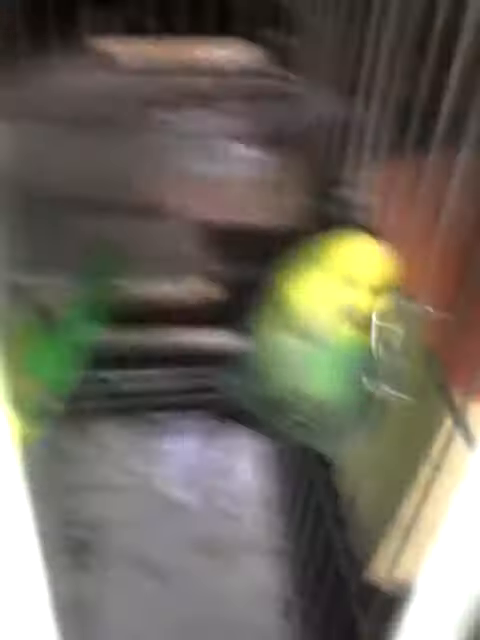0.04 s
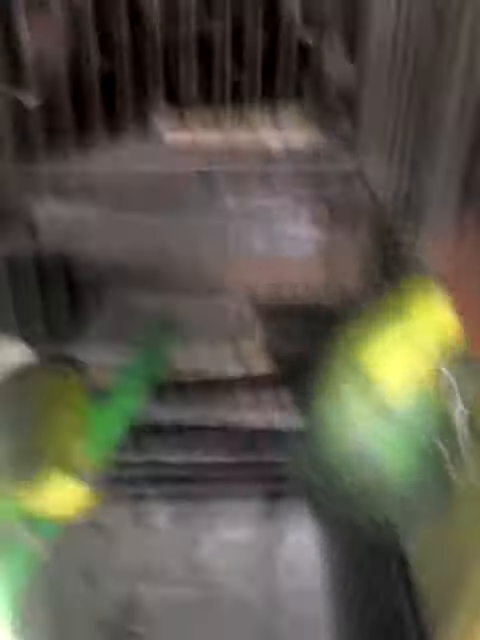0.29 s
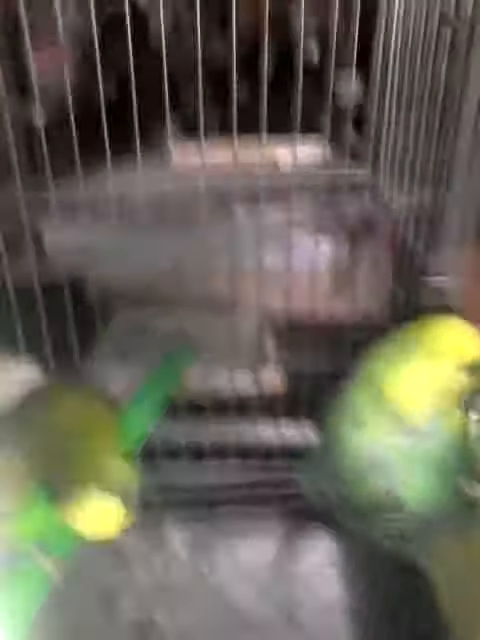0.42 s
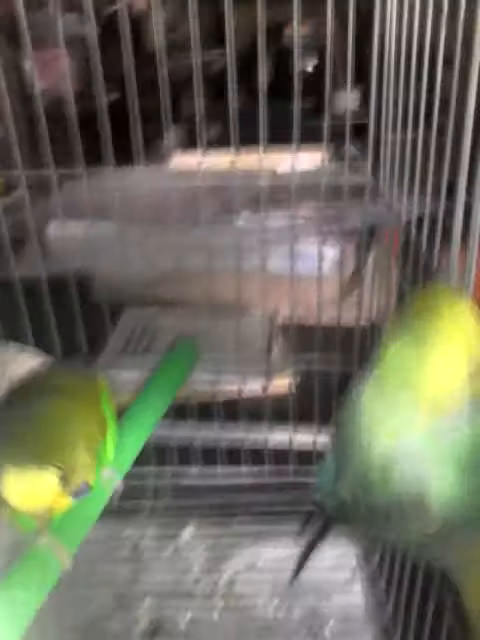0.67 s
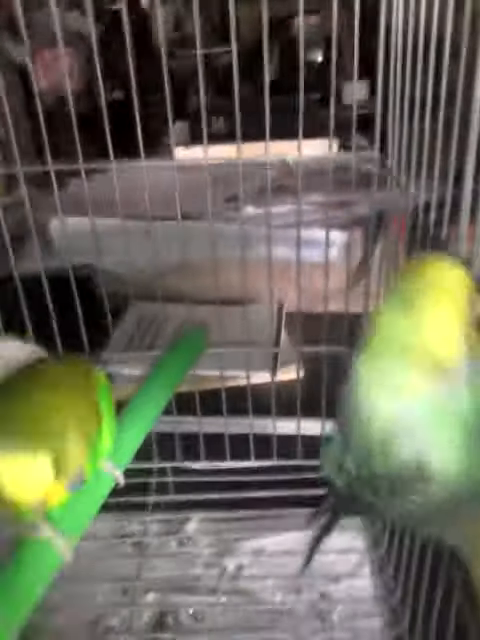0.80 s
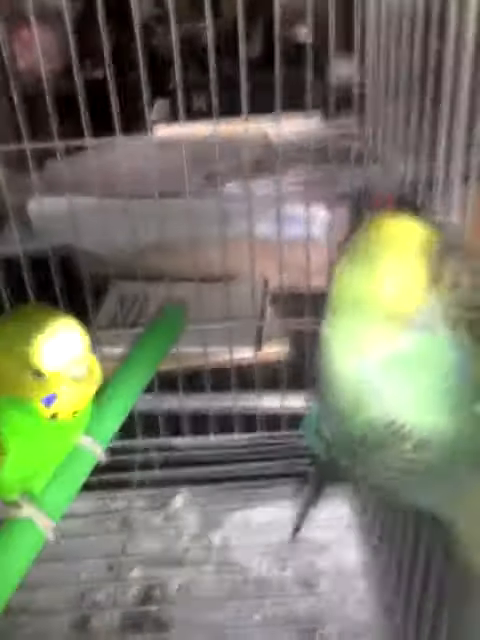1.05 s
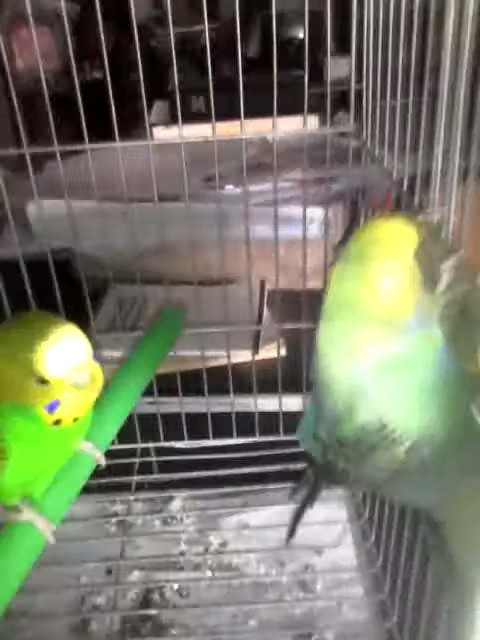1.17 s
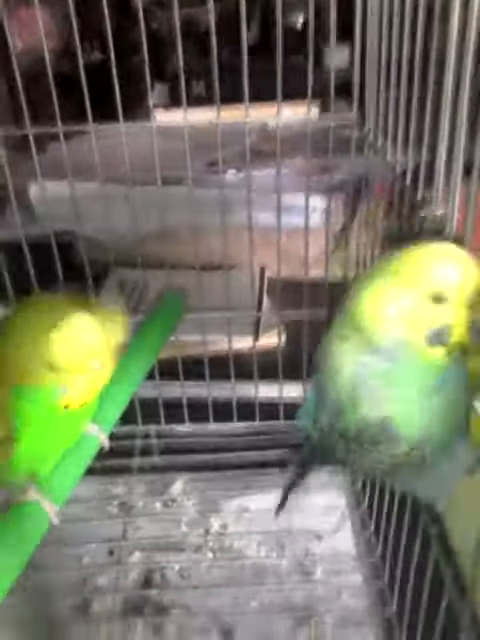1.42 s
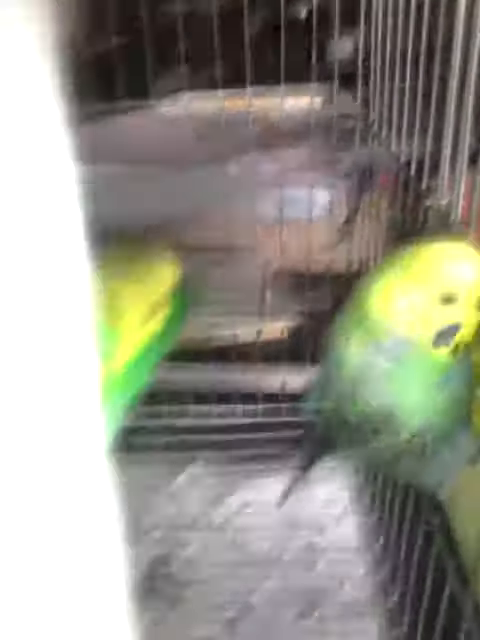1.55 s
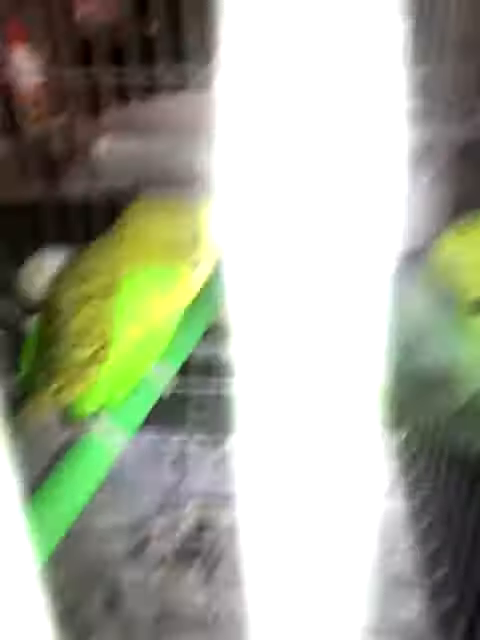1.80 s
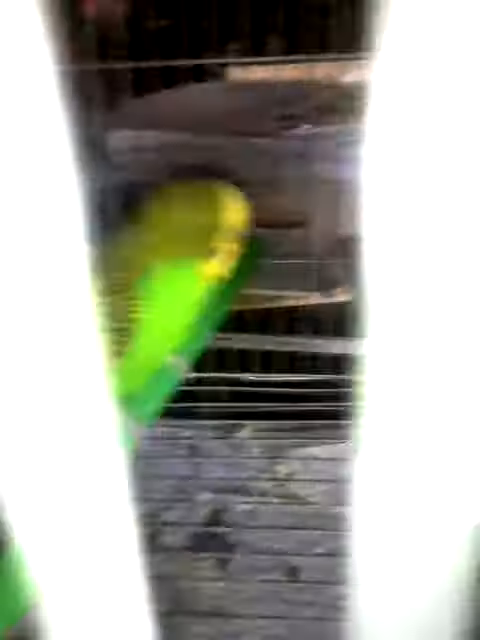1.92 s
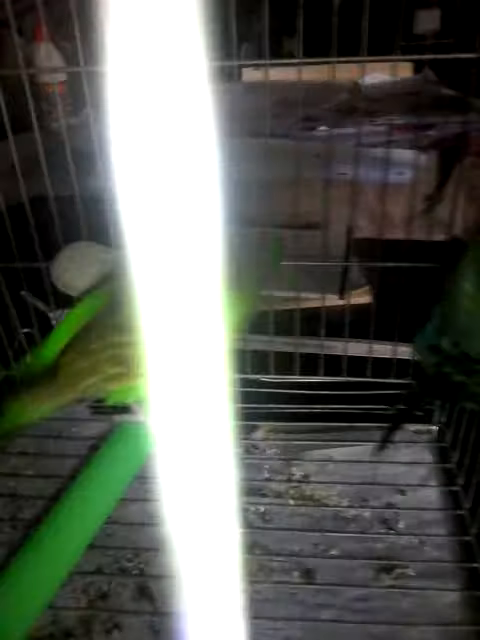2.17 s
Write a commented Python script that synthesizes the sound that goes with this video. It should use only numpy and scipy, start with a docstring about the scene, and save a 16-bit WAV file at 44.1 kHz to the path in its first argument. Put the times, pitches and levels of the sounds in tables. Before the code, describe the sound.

A budgerigar gives one quick chirping warble amid dull knocks and rubbing of a handled phone

```python
"""In a quiet room a budgerigar in a wire cage gives one fast warbling call; a fainter one trails after it.
The call is a run of short gliding whistles with weak overtones and a faint reverberant tail.
A hand shifts on the phone: slips and knocks excite damped resonances of the case, which rubs and rings dully.
A broad hiss of coloured noise swells and fades; faint resonant rustling comes before and after,
and at last only that and the steady room air are left."""
import sys
import numpy as np
from scipy import signal
from scipy.io import wavfile
from scipy.ndimage import uniform_filter1d

SR = 44100
rng = np.random.default_rng(int(sys.argv[2]) if len(sys.argv) > 2 else 0)


def boost(x):
    """Linear amplitude factor 10**(x/20) for a level x in decibels (scalar or array-like)."""
    u = np.asarray(x, float) / 20
    return 10 ** u


def inscribe(sig):
    """Save sig as 16-bit PCM at rate SR to the path in sys.argv[1].

    A 1-D sig is mono; a 2-D sig holds one channel per row.
    Samples are clipped to [-1, 1] before scaling.
    """
    pcm = np.round(np.clip(np.atleast_2d(sig).T, -1, 1) * 32767)
    wavfile.write(sys.argv[1], SR, pcm.astype(np.int16))


N = 99225  # samples, 2.25 s


def unit_rms(x):
    """Normalisation: scales a signal to a root mean square of 1."""
    return x / np.sqrt(np.mean(x ** 2) + 1e-20)


def read(points, hz):
    """Spectral interpolation: reads a table of points on a logarithmic frequency axis."""
    f, value = np.transpose(points)
    return np.interp(np.log(hz + 1), np.log(f + 1), value)


def envelope(s, db, smoothing):
    """Amplitude modulation: a gain from levels linear in dB, -120 dB outside, averaged over some samples."""
    level_db = np.interp(np.arange(N) / SR, s, db, left=-120, right=-120)
    return uniform_filter1d(boost(level_db), size=smoothing)


def add(mix, s, sound):
    """Superposition: adds a sound into the mix from time s on."""
    part = mix[round(s * SR):][:len(sound)]
    part += sound[:len(part)]


def resonate(x, hz, pole_width):
    """Heterodyne resonance of movable centre: shift down to zero, smooth three times, shift back."""
    turn = np.exp(2j * np.pi * np.cumsum(hz * np.ones(len(x))) / SR)
    r = np.exp(-np.pi * pole_width / SR)
    low = x / turn
    for _ in range(3):
        low = signal.lfilter([1 - r], [1, -r], low)
    return 2 * (turn * low).real / np.sqrt(pole_width)


def rings(x, modes):
    """Modal superposition: sums the responses of several resonances to one excitation."""
    # three equal poles in a row are about half as wide as one, hence the doubling
    return sum(boost(db) * resonate(x, hz, 2 * width) for hz, width, db in modes)


def noise(colour, patchy_db, extra_db=0):
    """Short-time spectral synthesis: random spectra with drifting patches; extra_db is f(Hz, s) or 0."""
    frames, hz = N // 128 + 5, np.fft.rfftfreq(512, 1 / SR)[:, None]
    real, imaginary, patches = rng.standard_normal((frames, 257, 3)).T
    patches = uniform_filter1d(patches, size=6, axis=0)
    patches = unit_rms(uniform_filter1d(patches, size=12, axis=1))
    z = (real + 1j * imaginary) * boost(read(colour, hz) + patchy_db * patches)
    # the rms is taken before extra_db, so that its levels survive
    scale = np.sqrt(np.mean(signal.istft(z, nperseg=512, noverlap=384)[1] ** 2))
    if extra_db:
        z = z * boost(extra_db(hz, np.arange(frames) * 128 / SR))
    return signal.istft(z, nperseg=512, noverlap=384)[1][:N] / scale


# spectrum of the steady background: f/Hz, relative density level/dB
AIR_COLOUR = [(20, -22.5), (90, -1.5), (235, -12.5), (400, -1), (605, -8), (1100, -18), (1850, -15),
              (2300, -18.5), (6300, -22), (7300, -29.5), (9000, -33.5), (15400, -34)]
AIR_DB = -71  # overall rms level


def room_air():
    """Stationary coloured noise: faint room air and circuit noise."""
    return boost(AIR_DB) * noise(AIR_COLOUR, patchy_db=0.0)


# dull rustle, one list before and one after: t/s, dull level/dB, dull ring f/Hz, bass level/dB
RUSTLE = [
    [(0.0, -63.5, 515, -63), (0.074, -63.5, 640, -76), (0.1, -76, 565, -74), (0.12, -58, 540, -74)],
    [(1.6, -58, 607.7, -67.5), (1.66, -70, 570, -63.5), (1.8, -91, 585, -69), (1.92, -73.5, 615, -81.5),
     (2.25, -65.5, 569, -69.5)],
]
# fixed resonance above the dull ring: f/Hz, width/Hz, relative level/dB
RUSTLE_UPPER = [(930, 360, -9)]
# low resonances: f/Hz, width/Hz, relative level/dB
RUSTLE_BASS = [(139, 88, 0), (240, 44, -6)]
RUSTLE_WIDTH_HZ = 85


def rustle():
    """Resonant filtering of noise: a dull, drifting ring and low fixed ones."""
    t, out = np.arange(N) / SR, np.zeros(N)
    for rows in RUSTLE:
        s, dull_db, ring_hz, bass_db = np.transpose(rows)
        source = rng.standard_normal(N)
        dull = resonate(source, np.interp(t, s, ring_hz), 2 * RUSTLE_WIDTH_HZ)
        dull = dull + rings(source, RUSTLE_UPPER)
        bass = rings(rng.standard_normal(N), RUSTLE_BASS)
        for x, level_db in ((dull, dull_db), (bass, bass_db)):
            out += unit_rms(x) * envelope(s, level_db, 200)
    return out


# course of the hiss: t/s, level/dB before a common lift of 4.5 dB, extra level below 3.3 kHz/dB
HISS = [(0.0, -58.5, 0), (0.094, -58, -1.5), (0.174, -62, 1), (0.248, -57, 1), (0.51, -59.5, 0.5),
        (0.569, -55, 2.5), (0.838, -56, -1), (0.942, -61, -1), (0.946, -60, 5), (1.068, -58, 0),
        (1.248, -72.5, -4.5), (1.326, -60, -1), (1.62, -93.5, 0)]
# its spectrum: f/Hz, relative density level/dB
HISS_COLOUR = [(900, -53), (1370, -24.5), (1700, -18), (2030, -12), (2480, -10), (3330, -4), (3800, -6),
               (5440, -6.5), (6500, -3), (7000, -12), (7650, -25), (8600, -38.5), (10200, -36.5),
               (11500, -45), (14000, -46.5), (15500, -65.5)]
PATCHY_DB = 2  # rms depth of the patches
# above TOP_HZ the hiss gains TOP_GROWTH dB more per dB of level over HISS_LOUD_DB, and loses it below
TOP_HZ, TOP_GROWTH, HISS_LOUD_DB = 6260, 0.88, -58


def hiss():
    """Time-varying coloured noise: level and spectral tilt drift, and the treble opens with strength."""
    s, db, tilt_db = np.transpose(HISS)

    def course(hz, t):
        """Level modulation: gain in dB by frequency and time."""
        level = np.interp(t, s, db, right=-120) + 4.5
        tilt = np.interp(t, s, tilt_db) * np.clip((4800 - hz) / 1500, 0, 1)
        over_db = np.interp(t, s, db) - HISS_LOUD_DB
        top = TOP_GROWTH * over_db * np.clip((hz - TOP_HZ) / 800, 0, 1)
        return level + tilt + top

    return noise(HISS_COLOUR, PATCHY_DB, course)


SLIPS_PER_S, SLIP_SPREAD_DB, CLUMP_DB = 4000, 1.5, 2  # mean rate, exponential spread, rms of clumping


def slips():
    """Stick-slip friction as a random impulse train: clumped slips of skin on plastic."""
    clumps = unit_rms(uniform_filter1d(rng.standard_normal(N), size=300))
    size = boost(SLIP_SPREAD_DB * np.minimum(rng.exponential(1, N), 4) + CLUMP_DB * clumps)
    happens = rng.random(N) < SLIPS_PER_S / SR
    return size * happens * rng.choice([-1., 1.], N)


# rubbing hand: t/s, main level/dB, main ring f/Hz, lower level/dB, bass level/dB, upper level re main/dB
HAND = [(0.119, -50.5, 734, -44, -70, -30), (0.183, -56, 737, -47.5, -54.5, -12),
        (0.225, -42.5, 752, -48.5, -64, -14), (0.27, -44, 752, -45.5, -59, -19),
        (0.296, -59.5, 750, -58, -64, -23), (0.372, -60, 745, -55.5, -68, -35),
        (0.409, -41, 773, -55, -72, -14), (0.445, -39.5, 771, -43.5, -54, -16),
        (0.474, -43.5, 771, -51, -62, -23), (0.5, -57, 770, -49.5, -59, -19),
        (0.572, -58.5, 769, -54, -60, -26), (0.596, -44, 769, -57, -61, -27),
        (0.613, -45, 760, -45.5, -56.5, -16), (0.639, -33.5, 740, -35, -52.5, -18),
        (0.675, -39, 742, -40, -49.5, -12.5), (0.729, -30, 709, -36, -53.5, -20),
        (0.761, -34.5, 708, -46.5, -49.5, -19), (0.843, -35.5, 752, -49, -60.5, -15),
        (0.941, -37.5, 792, -52, -50, -11), (0.981, -44.5, 766, -55, -57, -11),
        (1.067, -40.5, 759, -55, -66, -24), (1.121, -53, 766, -67.5, -52.5, -6.5),
        (1.141, -49, 793, -60, -71, -5), (1.219, -41.5, 724, -53.5, -62, -21),
        (1.325, -55, 727, -67, -62.5, -31), (1.359, -39, 742, -70, -65, -8),
        (1.379, -38.5, 732, -53, -54.5, -13), (1.437, -49.5, 764, -59.5, -69, -15.5),
        (1.457, -43, 765, -54.5, -54.5, -18.5), (1.531, -50.5, 754, -58.5, -66, -20),
        (1.559, -50.5, 768, -57.5, -87, -5), (1.585, -37.5, 773, -54, -81, -23.5)]
# resonances of the case, fixed ones beside the moving main ring: f/Hz, width/Hz, relative level/dB
MAIN = [(709.3, 42, -3.5), (834.2, 189, 4)]
LOWER = [(506, 61.7, 2), (459.2, 41, -6)]
BASS = [(125.5, 54, -0.5), (249.3, 29, -1.5), (84.04, 82, -2.5)]
UPPER = [(1795, 83, -7.5), (2036, 190, 1), (2500, 250, -3.5)]
MAIN_WIDTH_HZ = 70.7  # of the moving ring


def rubbing():
    """Friction-excited modal vibration: slips ring the case, and the grip shifts the main ring."""
    t = np.arange(N) / SR
    s, main_db, ring_hz, lower_db, bass_db, upper_db = np.transpose(HAND)
    friction = slips()
    main = rings(friction, MAIN) + resonate(friction, np.interp(t, s, ring_hz), 2 * MAIN_WIDTH_HZ)
    layers = [(main, main_db), (rings(slips(), LOWER), lower_db),
              (rings(slips(), BASS), bass_db), (rings(friction, UPPER), main_db + upper_db)]
    return sum(unit_rms(x) * envelope(s, db, 90) for x, db in layers)


# knocks: t/s, main ring peak level/dB, lower ring peak level/dB, bass thump peak level/dB
KNOCKS = [(0.118, -51, -70, -59), (0.218, -40.5, -39, -45.5), (0.469, -42.5, -73, -72),
          (0.632, -32, -37, -53), (0.692, -31, -43.5, -39.5), (0.722, -27, -33, -40.5),
          (0.759, -26, -34, -58), (1.347, -55, -52, -38), (1.3595, -28.5, -59, -60),
          (1.456, -40.5, -51.5, -54), (1.443, -36, -63, -65.5), (1.536, -40, -62, -61),
          (1.5565, -30, -69.5, -75), (1.573, -40, -59, -70), (1.616, -55.5, -61, -68)]
KNOCK_S = 0.00048  # time for the soft push to reach its peak
KNOCK_UPPER_DB, KNOCK_UPPER_HZ = -19, 2029  # upper ring: level re main, frequency


def knocks():
    """Impact excitation: an impulse rings the upper modes, a rounded push the lower ones."""
    out = np.zeros(N)
    s, _, ring_hz, *_ = np.transpose(HAND)
    u = np.arange(4096) / SR / KNOCK_S
    soft = [rings(u * np.exp(-u), modes) for modes in (LOWER, BASS)]
    for start, db, lower_db, thump_db in KNOCKS:
        frequencies = (np.interp(start, s, ring_hz), KNOCK_UPPER_HZ)
        sharp = [resonate(u == 0, hz, 2 * MAIN_WIDTH_HZ) for hz in frequencies]
        levels = (db, db + KNOCK_UPPER_DB, lower_db, thump_db)
        for blow, level_db in zip(sharp + soft, levels):
            add(out, start, boost(level_db) * blow / abs(blow).max())
    return out


# reverberation of the room: f/Hz, decay time by 60 dB t60/s
ROOM = [(1500, 0.2), (2500, .33), (4000, 0.33), (6000, 0.15), (11000, 0.1)]
ROOM_DB = -9  # energy of the tail against the direct sound


def room(x):
    """Statistical reverberation: sparse taps of random sign, each band decaying at its own rate."""
    taps = np.zeros(SR)
    at = np.arange(300, SR - 20, 20)
    taps[at + rng.integers(0, 20, len(at))] = rng.choice([-1., 1.], len(at))
    hz, t, z = signal.stft(taps, SR, nperseg=256)
    decay = boost(-60 * t / read(ROOM, hz)[:, None])
    tail = signal.istft(z * decay, SR, nperseg=256)[1]
    return boost(ROOM_DB) * signal.fftconvolve(x, tail / np.linalg.norm(tail))[:N]


# whistled notes: start t/s, length t/s, first f/Hz, last f/Hz, level/dB
NOTES = [(.845, 0.012, 3600, 2800, -42.5), (.858, 0.014, 1940, 2285, -38), (.860, .005, 2780, 3240, -31.5),
         (0.852, .007, 5000, 4140, -46.5), (.860, 0.0045, 5700, 4330, -43),
         (0.863, 0.018, 3536, 3755, -30.5), (0.876, .011, 3756, 3610, -26.5),
         (0.885, 0.014, 2470, 1495, -32.5), (0.887, 0.019, 3887, 2640, -29),
         (0.895, 0.022, 1430, 1470, -39), (.907, .011, 3600, 3606, -32.5),
         (.913, 0.0073, 2586, 2900, -30.5), (0.916, 0.03, 4250, 3775, -31),
         (0.938, 0.013, 3488, 3105, -20.5), (0.946, 0.015, 3045, 2910, -29), (0.948, .008, 2798, 1944, -24),
         (.949, .028, 2008, 2157, -25), (.975, .004, 1700, 2085, -30.5), (0.979, 0.0092, 2266, 2775, -25),
         (0.986, 0.0093, 3000, 3170, -23.5), (.993, 0.0053, 2820, 2990, -23),
         (0.998, .0055, 2977, 3435, -24.5), (1.078, 0.013, 3110, 3860, -41.5),
         (1.091, 0.012, 3273, 2780, -38.5), (1.111, 0.016, 2370, 2430, -39.5),
         (1.12, 0.017, 3183, 2844, -36), (1.144, 0.017, 3810, 2720, -39), (1.158, 0.011, 2610, 2830, -39.5),
         (1.176, 0.013, 2847, 2350, -34), (1.192, 0.019, 2210, 2210, -37.5),
         (1.206, 0.013, 2263, 2046, -35), (1.212, 0.026, 2181, 2073, -41),
         (1.243, 0.006, 2130, 2100, -36.5)]
# second harmonic, by the frequency where it falls: f/Hz, level re fundamental of a LOUD_DB note/dB
OCTAVE = [(3000, -49), (4200, -24), (5200, -12.5), (6200, -43), (7400, -21.5), (8300, -33)]
# third harmonic, likewise: f/Hz, level/dB
HIGHER = [(6000, -44), (8300, -51.5), (9600, -43.5), (10300, -53.5), (11100, -36.5), (12500, -67.5)]
OVERTONE_GROWTH, LOUD_DB = 0.7, -25  # overtones gain this many dB more per dB of note level
EDGE, LEAN = .4, 1.1  # share of a note in each of swell and fade; above 1 it peaks a little late
WOBBLE, RASP, OVERTONE_RASP = .017, .14, .7  # rms share: pitch unsteadiness, flutter of strength


def birds():
    """Frequency modulation: each note is a gliding, slightly unsteady whistle with weak harmonics."""
    out = np.zeros(N)
    shake = unit_rms(resonate(rng.standard_normal(N), 0, 1100))
    rasp = unit_rms(resonate(rng.standard_normal(N), 0, 900))
    for start, length, first_hz, last_hz, db in NOTES:
        u = np.arange(0, length, 1 / SR) / length
        span = slice(round(start * SR), round(start * SR) + len(u))
        hz = (first_hz + (last_hz - first_hz) * u) * (1 + WOBBLE * shake[span])
        phase = 2 * np.pi * np.cumsum(hz) / SR
        overtones = 0
        for k, table in ((2, OCTAVE), (3, HIGHER)):
            overtone_db = read(table, k * hz) + OVERTONE_GROWTH * (db - LOUD_DB)
            overtones = overtones + boost(overtone_db) * np.sin(k * phase)
        tone = (1 + RASP * rasp[span]) * np.sin(phase) + (1 + OVERTONE_RASP * rasp[span]) * overtones
        late = u ** LEAN
        swell = np.sin(np.pi / 2 * np.clip(np.minimum(late, 1 - late) / EDGE, 0, 1)) ** 2
        add(out, start, boost(db) * swell * tone)
    return out


def scene():
    """Linear superposition: rustle, hiss, hand, and the bird heard directly and through the room."""
    bird = birds()
    return (rustle() + hiss() + rubbing() + knocks() + bird + room(bird))[None]


def band_limit(x):
    """A steep low-pass at the top of the band."""
    return signal.sosfilt(signal.butter(12, 15500, fs=SR, output="sos"), x)


def record(dry):
    """High-pass filtering: the microphone cuts the deep bass; then the steady background is added."""
    low_cut = signal.butter(3, 76, "high", fs=SR, output="sos")  # Hz
    mix = signal.sosfilt(low_cut, dry) + room_air()
    return band_limit(mix)


dry = scene()
out = record(dry)
inscribe(out)
```